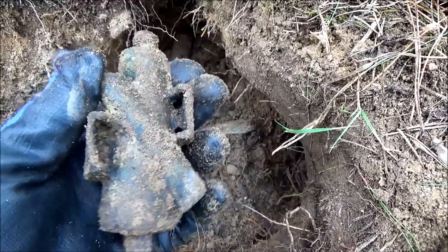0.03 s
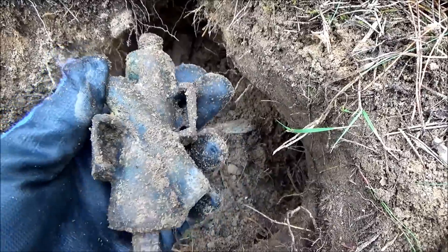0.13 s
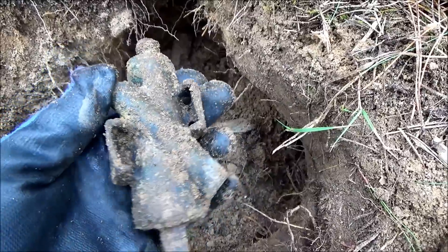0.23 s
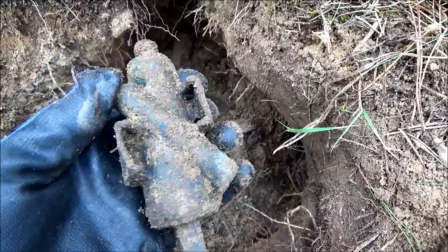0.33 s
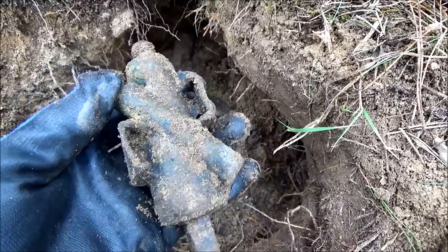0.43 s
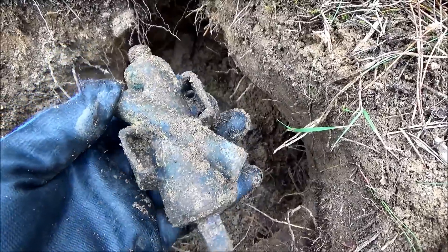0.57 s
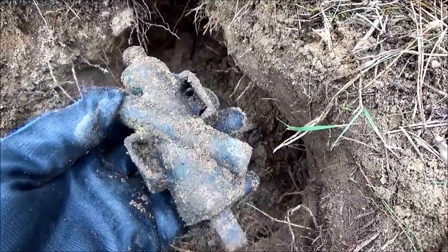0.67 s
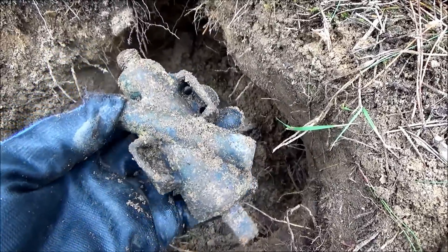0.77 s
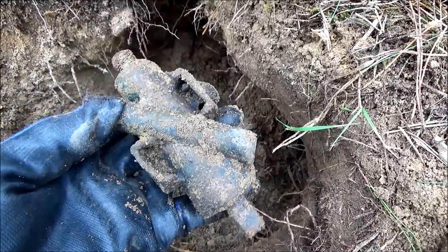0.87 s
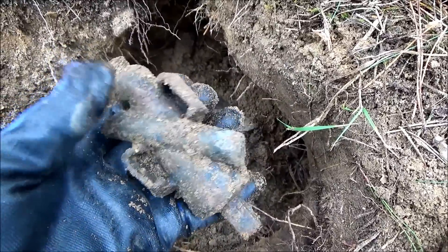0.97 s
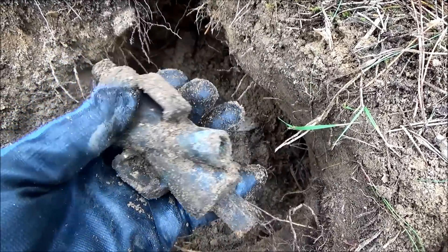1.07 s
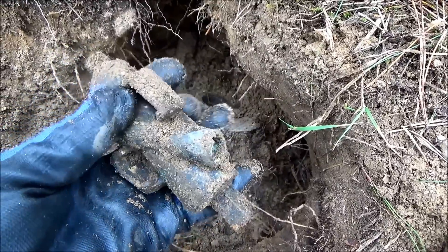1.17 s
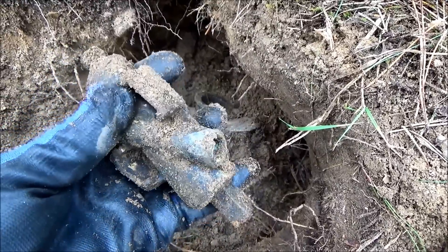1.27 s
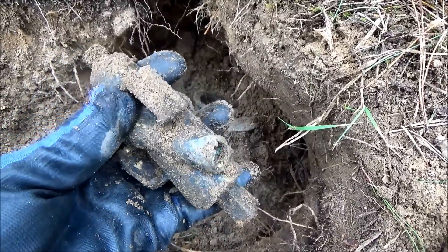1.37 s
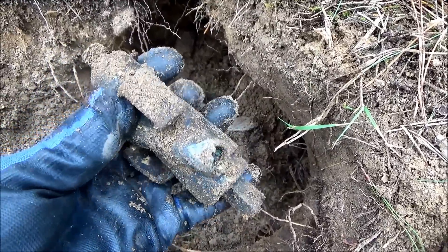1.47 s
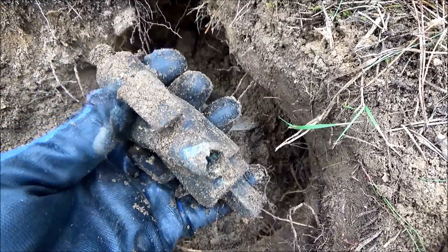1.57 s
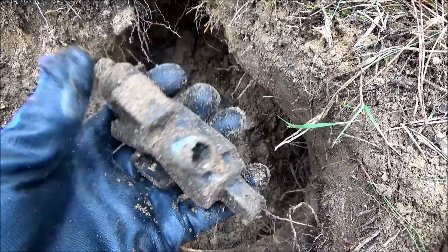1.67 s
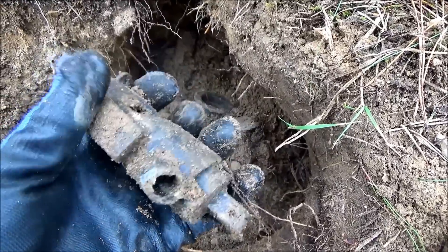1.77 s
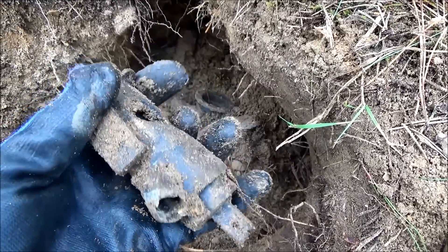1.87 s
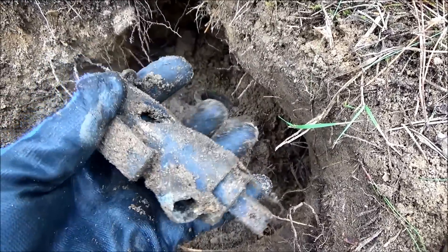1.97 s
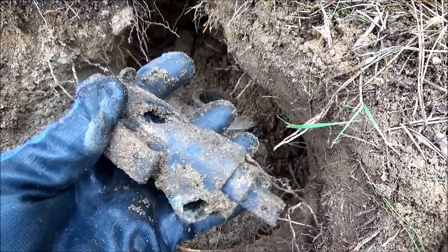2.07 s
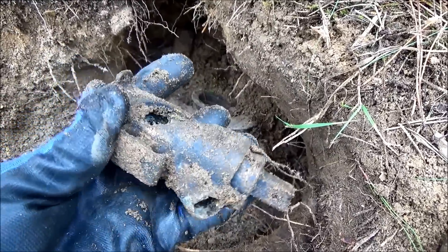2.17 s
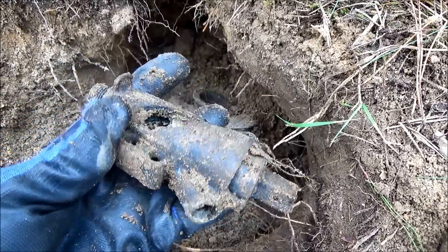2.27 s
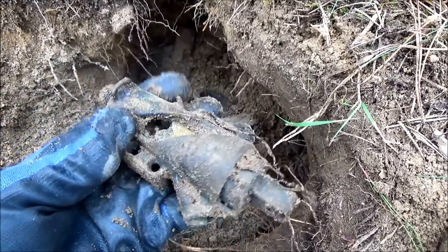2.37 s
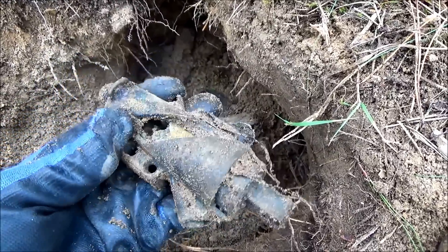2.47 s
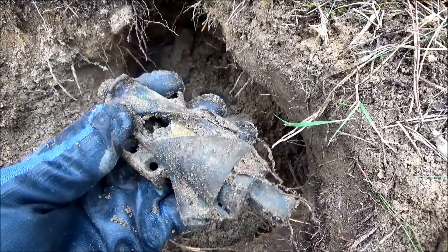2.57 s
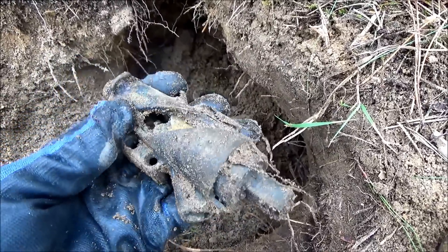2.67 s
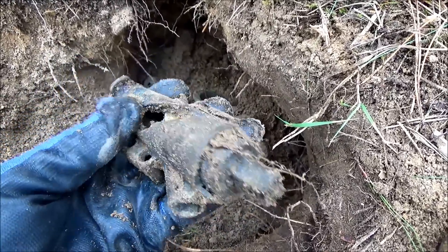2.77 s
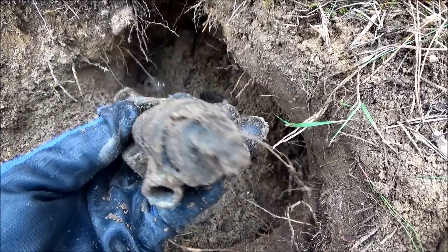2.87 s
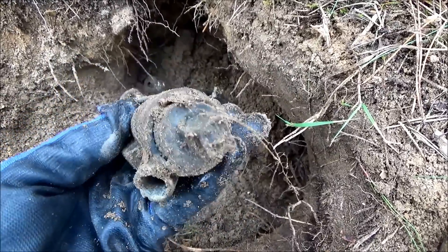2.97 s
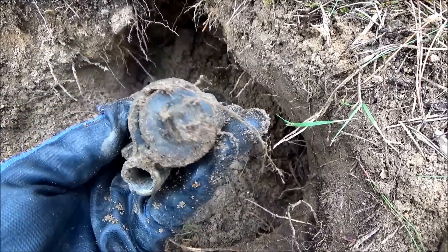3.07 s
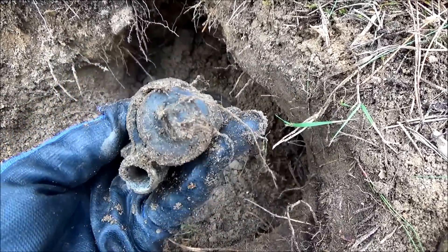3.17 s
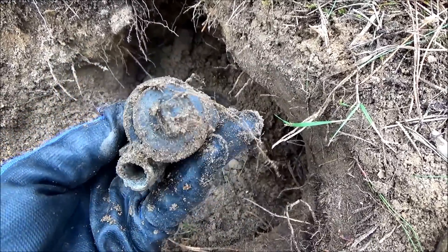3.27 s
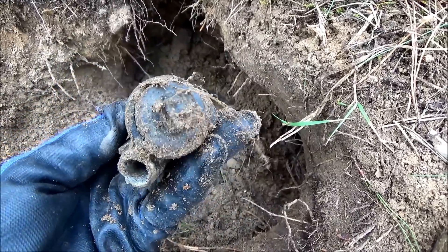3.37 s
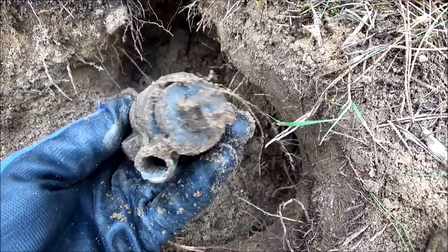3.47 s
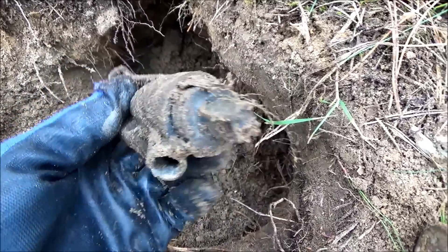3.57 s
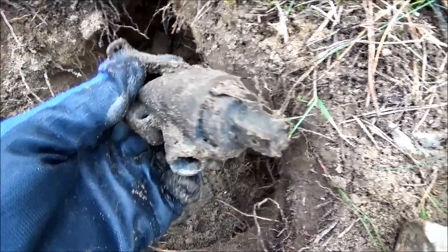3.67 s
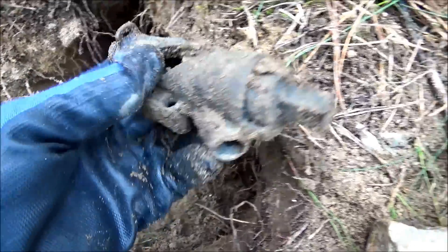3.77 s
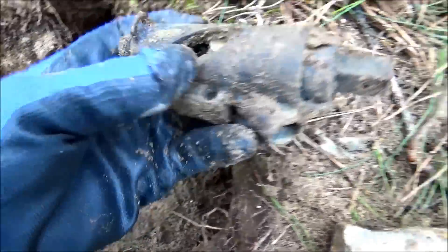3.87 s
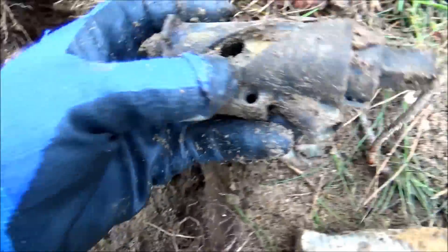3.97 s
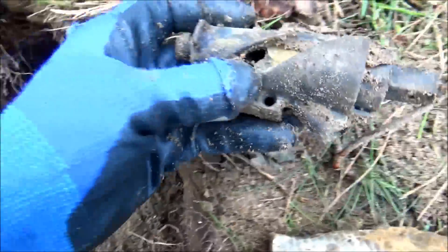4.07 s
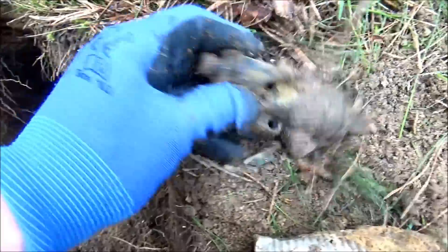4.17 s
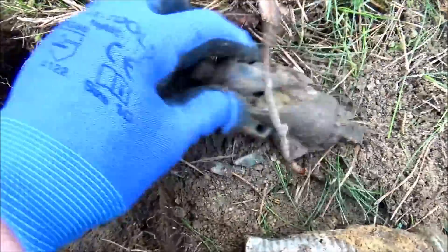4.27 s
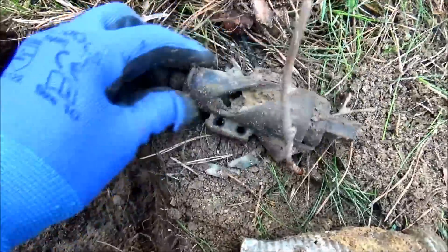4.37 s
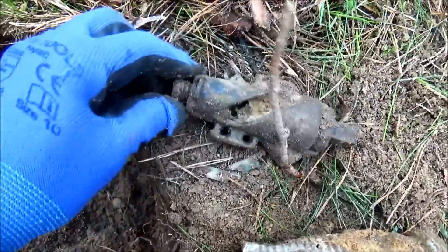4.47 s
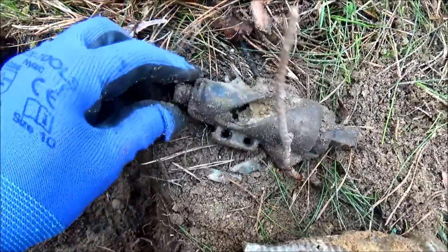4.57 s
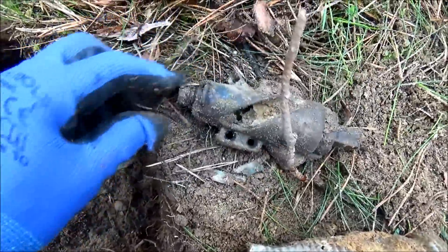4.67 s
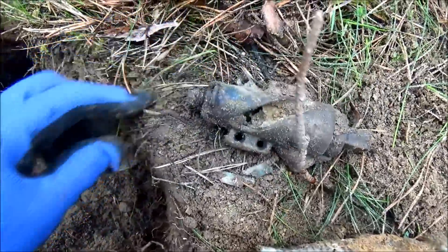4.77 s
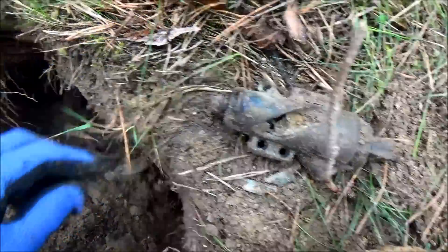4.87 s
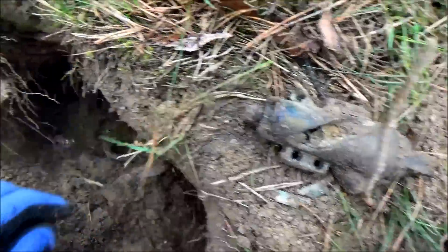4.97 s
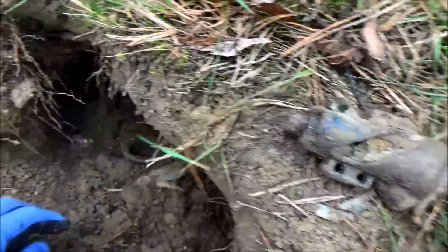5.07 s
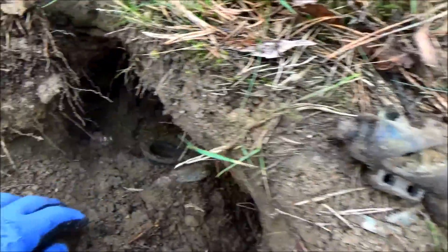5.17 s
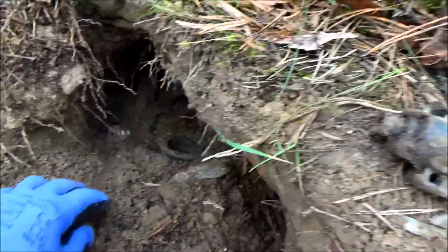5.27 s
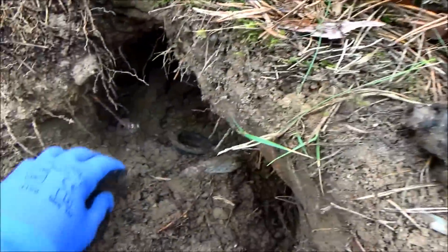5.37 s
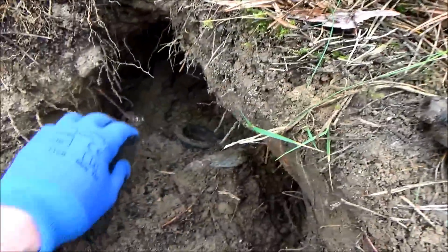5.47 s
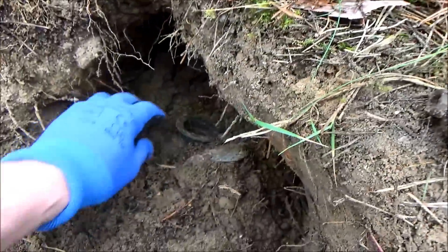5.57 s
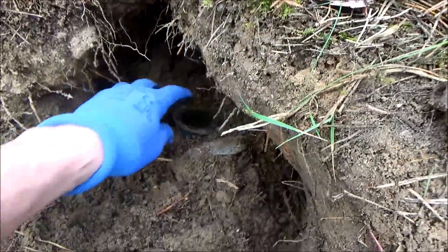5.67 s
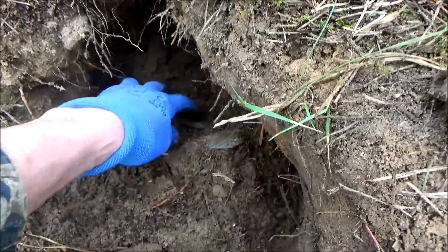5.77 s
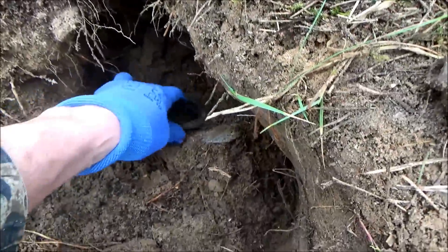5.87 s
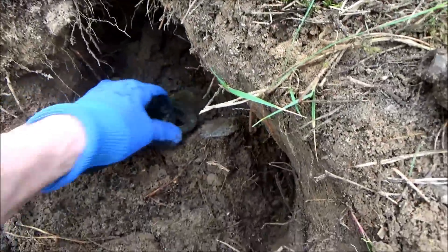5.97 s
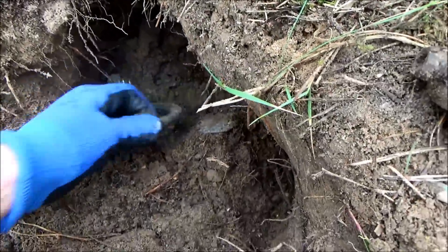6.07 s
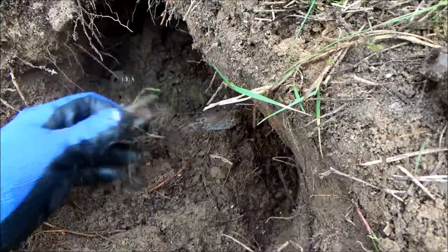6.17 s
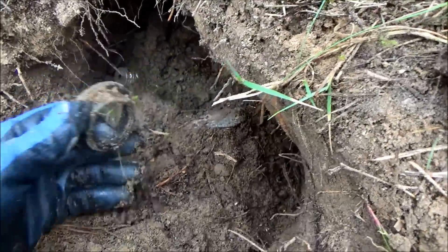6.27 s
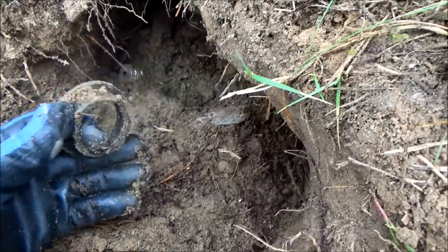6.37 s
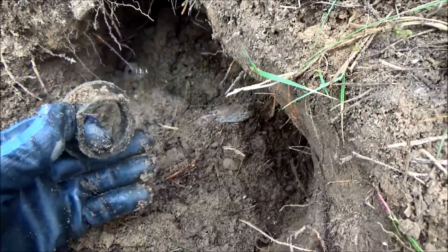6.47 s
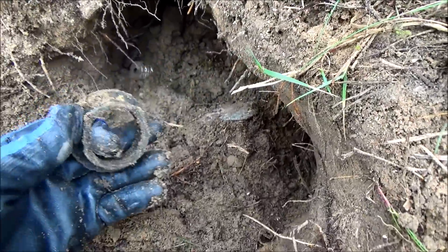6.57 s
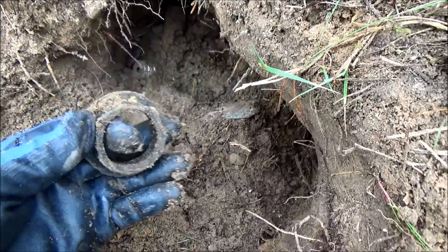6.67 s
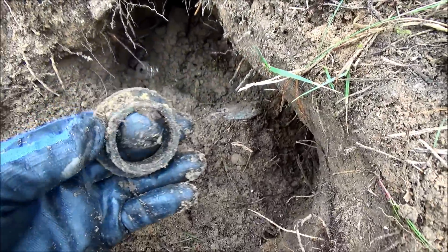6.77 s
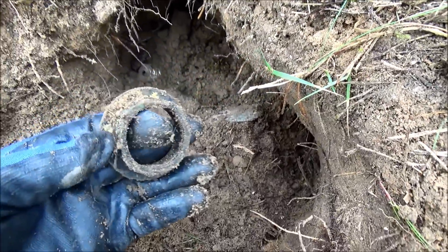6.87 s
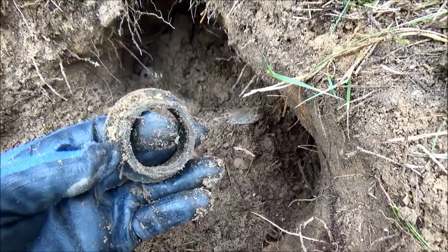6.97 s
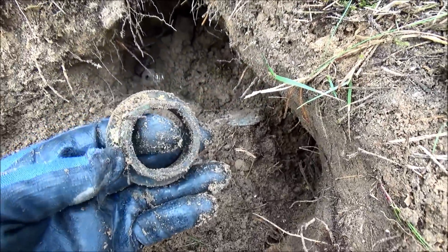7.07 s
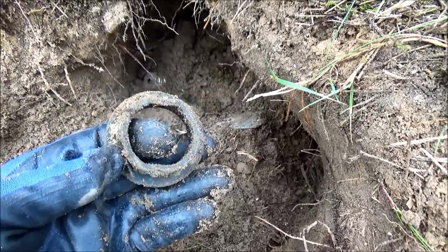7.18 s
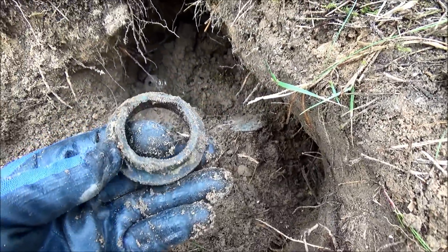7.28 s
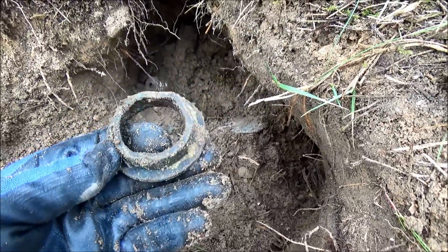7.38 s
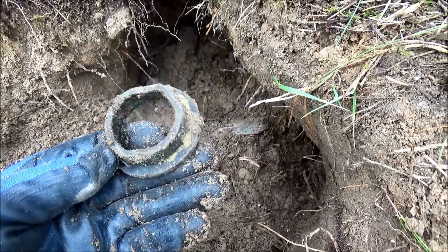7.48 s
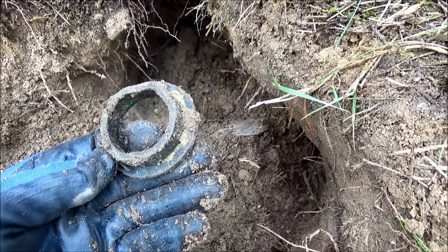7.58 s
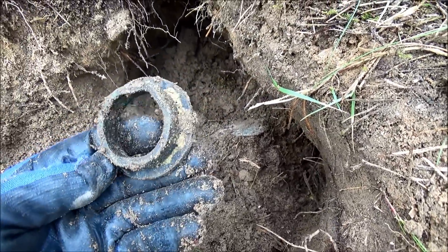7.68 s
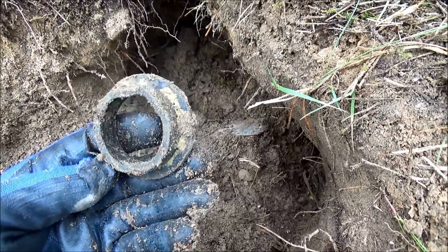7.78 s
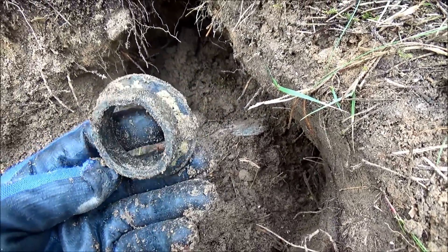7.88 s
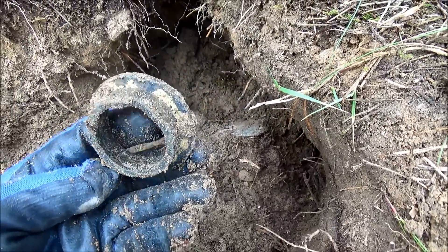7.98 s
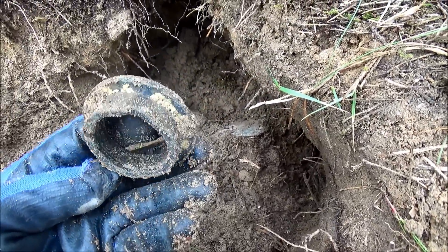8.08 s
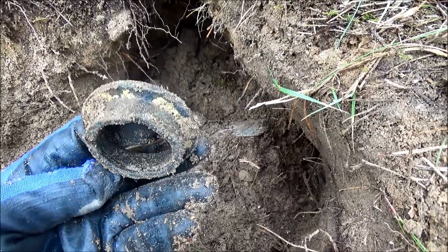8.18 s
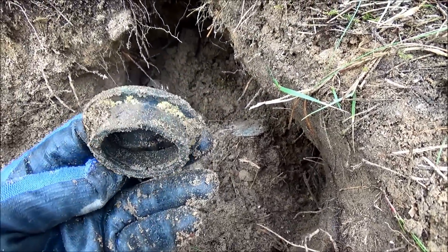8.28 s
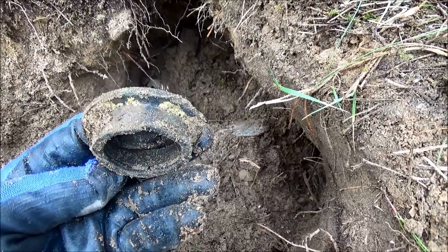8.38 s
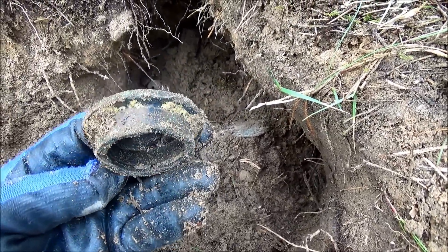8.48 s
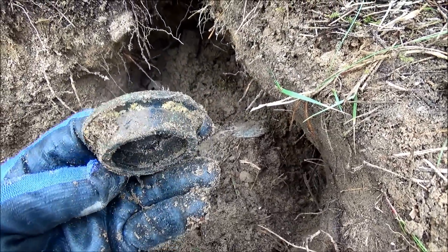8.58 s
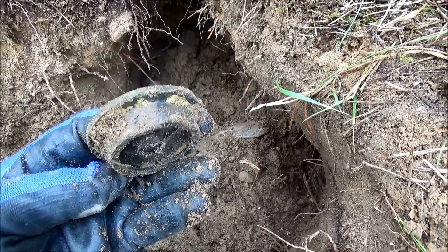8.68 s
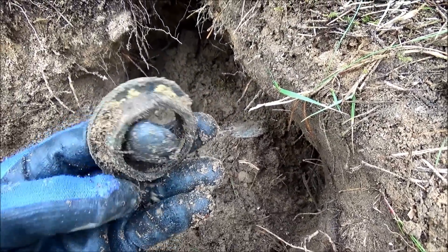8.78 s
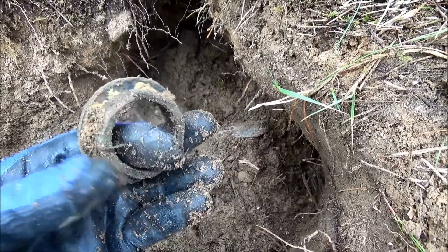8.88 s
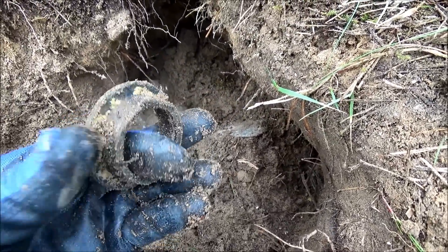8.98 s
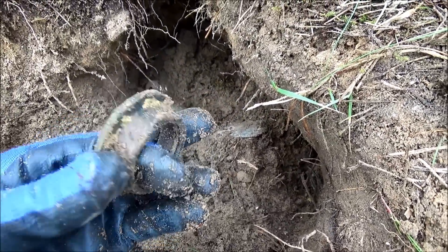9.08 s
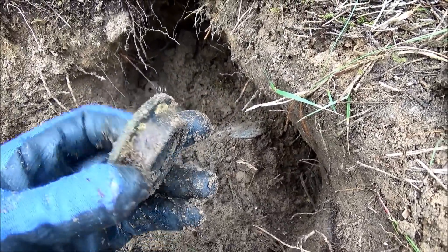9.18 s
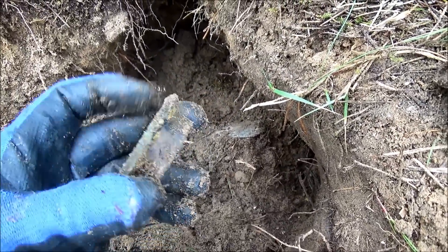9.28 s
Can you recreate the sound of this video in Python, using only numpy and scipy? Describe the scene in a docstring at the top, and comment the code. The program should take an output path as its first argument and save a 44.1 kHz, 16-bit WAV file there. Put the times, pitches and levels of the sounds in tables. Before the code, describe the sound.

An outdoor close-up in a quiet wood. Gritty glove strokes on a hollow, dirt-caked casting come busily for over four seconds, full of dry ticks. They nearly stop around five seconds, letting the birds and soft air through. After dull knocks in the earth near six, lighter rubbing resumes and ends with two brisk swipes. A thrush sings repeated gliding whistles with light tree echoes, with fainter birds far behind.

```python
"""Gloved hands on soil-crusted metal in a wood

Rubbing is dense fracture noise in four bands that follow each stroke; single grains snap as filtered bursts.
Slips sound the hollow casting, and damped sines thud softly and bump low. A thrush sings repeated phrases of
gliding pure tones, with tree echoes and fainter birds far off. Under them lies a hush of partly coherent noise
over a slowly swelling rumble."""
import sys
import numpy as np
from scipy import signal
from scipy.fft import rfft, irfft
from scipy.io import wavfile
from scipy.ndimage import uniform_filter1d

SR = 44100
rng = np.random.default_rng(int(sys.argv[2]) if len(sys.argv) > 2 else 0)


def output_pcm(signal):
    """Save a mono or channel-first signal as 16-bit PCM at the path in sys.argv[1].

    Samples are clipped to [-1, 1] before scaling.
    """
    pcm = np.clip(np.atleast_2d(signal).T, -1, 1) * 32767
    wavfile.write(sys.argv[1], SR, np.round(pcm).astype(np.int16))


N = 411453
TIME = np.arange(N) / SR


def amp(db):
    """Decibel law: 20 dB is a factor of ten in amplitude."""
    return 10 ** (np.asarray(db) / 20)


def evened(x):
    """Normalization to unit root-mean-square level."""
    return x / np.sqrt(np.mean(x ** 2) + 1e-20)


def steadied(x, size=1500):
    """Short-time normalization: the running power is made unity, the finer grain stays."""
    power = uniform_filter1d(uniform_filter1d(x ** 2, size), size)
    return x / np.sqrt(abs(power) + 1e-12)


def read(points, hz):
    """Interpolation of a spectrum on a logarithmic frequency axis."""
    f, value = np.transpose(points)
    return np.interp(np.log(hz + 1), np.log(f + 1), value)


def follow(rows):
    """Linear interpolation of a curve's columns at every sample."""
    times, *columns = np.transpose(rows)
    return [np.interp(TIME, times, column) for column in columns]


def add(mix, start_s, sound):
    """Superposition: a sound is summed into the mix from its start time."""
    part = mix[max(round(start_s * SR), 0):][:len(sound)]
    part += sound[:len(part)]


def colour(x, spectrum, size=2048):
    """Minimum-phase filtering: a causal response leaves clicks their sharp front."""
    hz = abs(np.fft.fftfreq(size, 1 / SR))
    log_gain = np.log(amp(read(spectrum, hz)) + 1e-5)
    # the Hilbert transform of the log gain gives the minimum phase
    taps = np.fft.ifft(np.exp(np.conj(signal.hilbert(log_gain)))).real
    return signal.oaconvolve(x, taps[:size // 2])[:len(x)]


def below(x, hz, order=4):
    """Zero-phase low-pass filtering, run forwards and backwards."""
    sections = signal.butter(order, min(hz, SR / 2 - 1), fs=SR, output="sos")
    return signal.sosfiltfilt(sections, x)


def wander(hz):
    """Low-passed noise: a slow random fluctuation with a spread of 1."""
    smoothing = 1 + (np.fft.rfftfreq(N, 1 / SR) / hz) ** 2
    return evened(irfft(rfft(rng.standard_normal(N)) / smoothing, N))


def swells(rows):
    """Power summation of bell-shaped strokes that speed up and slow down again."""
    edge_db = -21  # level of a bell one rise before its peak and one fall after, relative to the peak
    coarse_time, power = TIME[::32], 0
    for peak_s, rise_s, fall_s, db in rows:
        away = (coarse_time - peak_s) / np.where(coarse_time < peak_s, rise_s, fall_s)
        power = power + amp(db + edge_db * away ** 2) ** 2
    return np.interp(TIME, coarse_time, np.sqrt(power))


def crackle(per_s, spread_db, clump_db, clump_hz, ring_s, shift_hz=25, count=32):
    """Random fracture impulses in clumps: most small, few large; one contact spot rings alike."""
    size_db = spread_db * np.minimum(rng.exponential(1, N), 5) + clump_db * wander(clump_hz)
    happens = rng.random(N) < per_s / SR
    clicks = amp(size_db) * happens * rng.choice([-1, 1], N)
    # the contact spot drifts steadily and jumps about at random
    spot = np.round(2 * wander(shift_hz) + rng.standard_normal(N) + 10 * TIME) % count
    t = TIME[:200]
    rings = rng.standard_normal((count, len(t))) * np.exp(-t / ring_s)
    sound = np.zeros(N)
    for k, ring in enumerate(rings):
        sound += signal.oaconvolve(clicks * (spot == k), evened(ring))[:N]
    return sound


# Difference between the ports, before the source's own width is added: (frequency [Hz], level [dB])
PORT_WIDTH = [(110, -22), (380, -11), (700, -8), (1300, -12), (2400, -17), (4300, -22), (6000, -19),
              (8100, -12), (10000, -20), (15000, -28)]
# Left-over-right balance of the ports: (frequency [Hz], balance [dB])
PORT_BALANCE = [(400, 0), (1300, 1.3), (2700, .3), (5000, .5), (7500, 1.6), (10000, .6), (15000, 0)]


def ports(x, width_db, size=200):
    """Spatial decorrelation: two close microphone ports hear slightly different colours of one sound."""
    hz, spectrum = np.fft.rfftfreq(N, 1 / SR), rfft(x)
    scatter = np.exp(1j * np.angle(rfft(rng.standard_normal(size), N)))
    side = 1j * spectrum * scatter * amp(read(PORT_WIDTH, hz) + width_db)
    balance = amp(read(PORT_BALANCE, hz) / 2)
    return irfft(np.array([spectrum * balance + side, spectrum / balance - side]), N)


# Spectrum of air in the trees: (frequency [Hz], relative level [dB])
HUSH_SPECTRUM = [(12, -26), (20, 1.5), (107, 3), (459, -2), (780, -1), (1480, -7.5), (1660, -2.5),
                 (2530, -8.5), (2990, -5), (3840, -7), (5530, -12.5), (7730, -14.5), (9140, -11.5),
                 (14700, -22), (16000, -23)]
# Left-right coherence of that air: (frequency [Hz], coherence [0-1])
HUSH_COHERENCE = [(30, .99), (70, .975), (130, .92), (290, .65), (640, .3), (1400, .3), (3100, .8),
                  (6800, .5), (15000, .4)]
# Low rumble, before its quicker swell: (time [s], level [dB])
RUMBLE_LEVEL = [(0, -67), (2.3, -63), (3.3, -58.5), (4.3, -64), (5.6, -68), (6.9, -64.5), (7.8, -63.5),
                (8.7, -62.5), (9.33, -64)]


def hush():
    """Diffuse-field coherence: air in distant trees, over a rumble that swells and sinks."""
    air_db = -56  # level of the air below 1330 Hz, bass included
    swell_db, swell_hz = 2.5, 2.2  # random swell of the rumble
    hz = np.fft.rfftfreq(N, 1 / SR)
    left, other = rfft(rng.standard_normal((2, N)))
    same = np.clip(read(HUSH_COHERENCE, hz), 0, 1)
    right = same * left + np.sqrt(1 - same ** 2) * other
    air = irfft(np.array([left, right]) * amp(read(HUSH_SPECTRUM, hz)), N)
    air *= amp(air_db) / below(air, 1330).std()
    # the bass is lifted out and given the level of the rumble
    bass = below(air, 112)
    rumble_db, = follow(RUMBLE_LEVEL)
    return air - bass + evened(bass) * amp(rumble_db + swell_db * wander(swell_hz))


def whistles(rows):
    """Frequency modulation: pure notes, level or gently sliding, that swell and fade."""
    out = np.zeros(N)
    for start_s, length_s, start_hz, end_hz, db in rows:
        pitch = np.linspace(start_hz, end_hz, round(length_s * SR))
        tone = np.sin(2 * np.pi * np.cumsum(pitch) / SR)
        add(out, start_s, amp(db) * tone * signal.windows.tukey(len(pitch), .6))
    return out


def syllable(shape, stretch, size=90):
    """Phase integration of a gliding pitch; the sweep is stretched about its opening pitch."""
    offset_s, hz, db = np.transpose(shape)
    t = np.arange(offset_s[0], offset_s[-1], 1 / SR)
    pitch = uniform_filter1d(np.interp(t, offset_s, hz[0] + stretch * (hz - hz[0])), size)
    tone = np.sin(2 * np.pi * np.cumsum(pitch) / SR)
    return amp(np.interp(t, offset_s, db)) * tone * signal.windows.tukey(len(t), .08)


def phrases(pairs):
    """Superposition in time: each syllable shape is sung at the times of its phrase."""
    song = np.zeros(N)
    for shape, phrase in pairs:
        for anchor_s, db, stretch in phrase:
            add(song, anchor_s + shape[0][0], amp(db) * syllable(shape, stretch))
    return song


def trees(x, delay_s, t60):
    """Multiple scattering by trunks: sparse random echoes with exponential decay."""
    t = TIME[:SR]
    arrives = (rng.random(SR) < 1500 / SR) * (t > delay_s)
    taps = rng.standard_normal(SR) * arrives * amp(-60 * t / t60)
    return signal.fftconvolve(x, taps / np.linalg.norm(taps))[:N]


# Syllables of the thrush: (time from anchor [s], pitch before stretching [Hz], relative level [dB])
TUMBLE_SHAPE = [(-.013, 3450, -20), (-.0095, 3000, -4), (-.006, 2650, -8), (-.003, 2700, -35),
                (-.001, 3550, -13), (.003, 3000, -1), (.007, 2720, -4), (.009, 3150, -4), (.013, 2800, 0),
                (.02, 2450, -5), (.033, 1750, -20), (.046, 1500, -21), (.068, 1400, -25)]
WHIP_SHAPE = [(-.032, 3000, -28), (-.024, 5400, -17), (-.018, 6400, -22), (-.011, 5000, -17),
              (-.005, 3950, -1), (.001, 3650, 0), (.008, 3780, -1), (.014, 4400, -22)]
SCOOP_SHAPE = [(-.013, 3950, -18), (-.005, 3400, -3), (.002, 3270, 0), (.007, 3480, -2), (.013, 4200, -20)]
ARCH_SHAPE = [(-.075, 3050, -32), (-.05, 3100, -11), (-.032, 3250, -4), (-.018, 3570, -4),
              (-.007, 3920, -5), (.001, 4000, -5), (.01, 3830, -4), (.023, 3300, 0), (.037, 2970, -1),
              (.048, 2850, -4), (.058, 2820, -18)]
RISE_SHAPE = [(-.034, 1300, -24), (-.02, 1700, -15), (-.008, 2200, -8), (-.001, 2350, 0), (.009, 2330, -10)]
FLICK_SHAPE = [(-.007, 2600, -14), (-.003, 3400, -1), (0, 4200, 0), (.005, 5300, -9)]
# Its phrases, levels before flutter and mixing: (anchor time [s], level [dB], stretch of pitch sweep [ratio])
TUMBLE_PHRASE = [(1.904, -25, 1), (2.161, -22.5, 0.98), (2.388, -23.5, 1), (2.62, -25, 0.97)]
WHIP_PHRASE = [(2.803, -22.5, 0.99)]
SCOOP_PHRASE = [(2.837, -24.5, 1), (2.873, -27.5, .88)]
ARCH_PHRASE = [(5.52, -36, 1.15), (5.811, -29.5, 1.13), (6.067, -24, .88), (6.306, -21.5, .6)]
RISE_PHRASE = [(6.467, -29.5, 0.96), (6.541, -31, 0.83), (6.608, -29, 0.97), (6.68, -31, 0.84),
               (6.749, -29.5, 0.88), (6.81, -30.5, 0.7)]
FLICK_PHRASE = [(6.881, -34, 1), (6.91, -33, 1), (6.941, -34, 1), (6.973, -34, 1), (7.007, -37, 1)]
# Whistles close by and deep in the wood, levels before flutter and mixing:
# (start time [s], length [s], start pitch [Hz], end pitch [Hz], level [dB])
NEAR_WHISTLES = [(1.019, .076, 3520, 3620, -35.5), (1.722, .03, 2050, 2450, -38),
                 (1.795, .042, 3260, 3170, -23), (6.014, .026, 4970, 4960, -33),
                 (6.043, .02, 4980, 4950, -34)]
DEEP_WHISTLES = [(.75, 0.053, 2200, 2050, -47), (1.14, .038, 2090, 2140, -44),
                 (1.28, 0.12, 2330, 2490, -52), (3.2, .2, 1685, 1915, -57), (4.86, 0.11, 2560, 2470, -54.5),
                 (5.0, 0.047, 4380, 4300, -51.5), (5.03, 0.15, 3080, 2750, -50),
                 (6.07, .04, 2210, 2170, -48), (6.29, 0.031, 2280, 2160, -46),
                 (7.15, 0.14, 2150, 2750, -49.5), (7.38, .07, 2250, 2040, -55.5),
                 (8.0, 0.066, 3780, 3630, -52), (8.05, 0.046, 2850, 2680, -55),
                 (8.26, 0.11, 4420, 4150, -54), (8.29, 0.102, 1630, 1483, -56), (8.4, .17, 1610, 1880, -59),
                 (8.42, 0.037, 2740, 2800, -48.5), (8.61, 0.095, 2180, 1890, -53),
                 (8.78, 0.033, 4400, 4300, -48), (9.115, .02, 3030, 3200, -44),
                 (9.24, 0.11, 2660, 2720, -50.5)]


def birds():
    """Direct-to-reverberant ratio: loud phrases are mostly direct; soft and far notes hold more echo."""
    loud_song = [(TUMBLE_SHAPE, TUMBLE_PHRASE), (WHIP_SHAPE, WHIP_PHRASE),
                 (SCOOP_SHAPE, SCOOP_PHRASE), (ARCH_SHAPE, ARCH_PHRASE)]
    soft_song = [(RISE_SHAPE, RISE_PHRASE), (FLICK_SHAPE, FLICK_PHRASE)]
    # each group's level flutters at random
    loud = (whistles(NEAR_WHISTLES) + phrases(loud_song)) * amp(2.4 * wander(150))
    soft = phrases(soft_song) * amp(3.5 * wander(260))
    far = whistles(DEEP_WHISTLES) * amp(2.7 * wander(120))
    # low notes spread wider from the beak and so return more echo
    spread = loud + amp(5) * below(loud, 2400) + amp(1) * soft
    early_echo = amp(-9) * trees(spread, delay_s=.007, t60=.18)
    late_echo = amp(-15) * trees(spread, delay_s=.03, t60=.8)
    distant = amp(-3) * far + amp(-2.5) * trees(far, delay_s=.004, t60=.55)
    return loud + amp(-3) * soft + early_echo + late_echo + distant


# Low knocks and soft bumps, levels before the onset and decay shape them: # (start time [s], level [dB],
# frequency [Hz], decay time constant [s])
LOW_THUDS = [(3.329, -48, 69, 0.03), (3.6, -56, 45, .04), (4.315, -35.5, 124, 0.007),
             (5.925, -33, 140, 0.0045), (5.979, -36.5, 167, .024), (6.011, -37.5, 352, 0.011),
             (6.043, -33, 219, 0.0058), (6.077, -35.5, 210, 0.013), (6.494, -47, 70, 0.028),
             (8.67, -51, 75, .03), (8.81, -49, 55, .025)]


def thuds(rise_s=0.002):
    """Damped oscillation: low knocks of metal and hand on earth, and softer low bumps."""
    out, t = np.zeros(N), TIME[:9000]
    for start_s, db, hz, decay_s in LOW_THUDS:
        envelope = np.exp(-t / decay_s) * (1 - np.exp(-t / rise_s))
        add(out, start_s, amp(db) * np.sin(2 * np.pi * hz * t) * envelope)
    return out


# Colour of the hollow casting: (frequency [Hz], relative gain [dB])
CASTING_COLOUR = [(700, -32), (1150, -8), (1400, 0), (1650, 6.5), (2150, 0), (2650, 1.5), (3300, -5),
                  (4500, -22), (7000, -11.5)]
# A finger drags over the casting: (time of greatest speed [s], rise [s], fall [s], level [dB])
CASTING_DRAGS = [(.13, 0.23, 0.16, -33), (.33, 0.091, 0.22, -34.5), (.63, 0.11, 0.15, -38)]


def dragging():
    """Stick-slip excitation: dense slips of the glove sound the hollow of the casting."""
    slips = crackle(6000, spread_db=1.5, clump_db=3, clump_hz=90, ring_s=0.00026)
    return steadied(colour(slips, CASTING_COLOUR)) * swells(CASTING_DRAGS)


def stray_snaps(rasp):
    """Random-arrival process: snaps at chance moments whose energy follows the rubbing, up to a limit."""
    per_s, limit_db = 14, -11  # mean rate and greatest energy
    over_rasp_db, low_db, spread_db = 17.5, 3, 2.5  # mean energy over the rasp, mean low boost, spread of both
    at = np.flatnonzero(rng.random(N) < per_s / SR)
    size, low = rng.standard_normal((len(at), 2)).T
    db = np.minimum(20 * np.log10(rasp[at]) + over_rasp_db + spread_db * size, limit_db)
    return list(zip(TIME[at], db, low_db + spread_db * low))


# Colour of a snapping grain: (frequency [Hz], relative gain [dB])
SNAP_COLOUR = [(300, -60), (1200, -26.5), (2500, -11), (5000, -0.5), (7500, 11), (9800, 16.5), (12500, 9),
               (16000, -4)]
# Grains that snap at set moments, beside the stray ones: (onset time [s], energy [dB], boost of the click below
# 5.2 kHz [dB])
SET_SNAPS = [(0.1998, -14, 7), (0.5614, 0, -10), (0.617, -2, 14), (0.7842, -6.5, 21), (0.7997, -5.0, 5),
             (0.813, -3, 4.0), (0.8291, -11, 4.0), (0.834, -5, 11), (1.0381, -9.5, -9),
             (1.1503, -4, 11.0), (1.2798, -14, 9.0), (1.3007, -7, 12), (1.4966, -4.5, 2),
             (1.904, -1.5, -5.0), (1.977, 5, 1), (1.996, 0, -4.0), (2.1332, -2, -5.0), (2.4724, -7, 5),
             (2.5052, -14, 7), (2.5356, -0.5, -13), (2.6233, -11, 1), (2.8005, -15, 4.0),
             (3.0656, -16, -2), (3.3097, -16, 7), (3.3298, -7, 17.5), (3.6754, 4, 0), (3.7074, 0, 20),
             (3.9384, 2, -2), (4.0594, 1, 1.0), (4.0651, -7.0, 6), (4.1333, -1, 7), (4.3865, -11, 1.0),
             (4.4337, 0, -4), (4.5174, -4, -5.0), (5.1417, -24, 21), (5.3755, -15.5, 25),
             (5.8115, -16.0, 1), (5.9375, -11.5, 6), (6.169, -5.5, 22), (6.2141, 0.0, 17),
             (6.9823, -9, 13), (7.0477, -17, 3.0), (7.2399, -7, -10), (7.9118, -4.5, 2),
             (7.9652, -7.5, 0.0), (8.1249, -15.5, 2.0), (8.1527, -10, -5.0), (8.1907, -12.5, -7),
             (8.3145, -14.5, -5), (8.3855, -11.5, 7), (8.4479, -16.5, 5.5), (8.4847, -16.5, -3.0),
             (8.6035, -18.5, -5.0), (8.7974, -14, 7), (8.9811, -6, 9), (9.1445, -8.5, 19),
             (9.2021, -2.0, -5.0)]


def snaps(rows, crumble_s=0.002, crumble_db=-17, front_s=.001):
    """Brittle fracture: a grain cracks, breaks with a sharp tick and sheds a few ms of crumbs."""
    out, t = np.zeros(N), TIME[:900] - front_s
    fracture = np.exp(-abs(t) / .00035) * (t >= 0)
    burst = fracture + amp(crumble_db) * np.exp(-abs(t) / crumble_s)
    for onset_s, db, low_db in rows:
        tick = colour(rng.choice([-1, 1], len(t)) * burst, SNAP_COLOUR)
        low = below(tick, 5200)
        tick = tick - low + amp(low_db) * low
        add(out, onset_s, amp(db) * tick / np.linalg.norm(tick))
    return out


# Strokes of the glove over crusted metal, soil and grass:
# (time of greatest speed [s], rise [s], fall [s], sandy rasp [dB],
#  then relative to the rasp: dull clods [dB], coarse grit [dB], fine dust [dB])
GLOVE_STROKES = [(0.045, 0.16, 0.023, -32.5, -22, -6, -13), (0.145, 0.12, 0.13, -25, -21.5, -4.0, -31),
                 (0.307, 0.11, 0.11, -30.5, -22, -0.5, -24), (0.43, 0.13, 0.04, -44, -2, -1, -8),
                 (0.582, 0.064, 0.19, -31.5, -22.5, -8.5, -21), (0.69, 0.08, 0.074, -40.5, -6, -14, -11.0),
                 (0.737, 0.5, 0.63, -35, -23.0, -9, -16), (1.022, 0.026, 0.029, -42.0, -3, 2, -8),
                 (1.189, 0.075, 0.16, -33.5, -16.5, -4.0, -9.0),
                 (1.626, 0.39, 0.25, -34.5, -20.0, -5.0, -13), (1.7, 0.036, 0.087, -28.5, -13.5, -2.5, -13),
                 (1.849, 0.084, 0.68, -31.0, -21, -11.5, -17),
                 (2.059, 0.069, 0.36, -32.0, -22.5, -9.5, -0.5), (2.327, 0.032, 0.67, -33, -17, -7.5, -11),
                 (2.476, 0.1, 0.015, -22.5, -21.5, -11.5, -10.0),
                 (2.627, 0.018, 0.096, -39.5, -19, -15, -7), (2.69, 0.01, 0.025, -32.5, -20, -18.5, -10),
                 (2.908, 0.13, 0.036, -34, -13.0, -4.5, -24),
                 (2.969, 0.054, 0.12, -30.5, -19.5, -11.5, -7.0),
                 (3.146, 0.048, 0.1, -40.5, -15, -9.5, -8.0), (3.33, 0.11, 0.06, -42, -10, -4.5, -9.0),
                 (3.443, 0.13, 0.13, -45.5, -5, -3, -11.0), (3.592, 0.099, 0.022, -29, -20.5, -12, -22),
                 (3.708, 0.14, 0.021, -23.5, -29, -8.5, -13), (3.748, 0.17, 0.056, -31, -13.5, -5.5, -10),
                 (3.952, 0.2, 0.091, -31, -14.5, -6.5, -16), (4.016, 0.045, 0.076, -31.5, -11.5, -8.5, -9),
                 (4.144, 0.062, 0.32, -37.5, -10.5, -9.5, -8.0),
                 (4.323, 0.15, 0.09, -28.0, -17, -8.5, -8.0), (4.43, 0.05, 0.03, -26, -25.0, -10.5, -6.0),
                 (4.482, 0.035, 0.1, -25.5, -24.5, -10.0, -14),
                 (4.77, 0.14, 0.084, -47.5, -18.0, -10, -9.0), (4.96, 0.3, 0.08, -49.5, -7.5, -5.0, -12),
                 (5.339, 0.044, 0.032, -53.5, -26, -4, -8.0), (5.824, 0.13, 0.2, -55.5, 2, -9, -6),
                 (5.927, 0.022, 0.05, -43, -14, -4, -4), (6.076, 0.14, 0.033, -36.5, -13.0, -5, -6),
                 (6.149, 0.08, 0.075, -39.5, -7, -2.5, -8.0), (6.356, 0.15, 0.14, -44.5, -26.0, -13, -13),
                 (6.674, 0.13, 0.025, -37.0, -22, -5, -16), (6.773, 0.08, 0.23, -40.5, -20.0, -8.5, -15),
                 (6.927, 0.07, 0.05, -36.5, -20, -4.5, -16), (7.074, 0.23, 0.017, -40, -20, -2.5, -14),
                 (7.18, 0.025, 0.036, -40, -18, -11, -15), (7.272, 0.19, 0.12, -40.5, -22, -9, -20),
                 (7.41, 0.14, 0.12, -42, -26, -10, -11), (7.525, 0.091, 0.16, -31, -32, -14.5, -13),
                 (7.784, 0.49, 0.3, -39.5, -38, -11.5, -13), (8.195, 0.082, 0.056, -45.5, -26, -15, -18),
                 (8.291, 0.012, 0.077, -44.5, -29, -17, -13), (8.555, 0.36, 0.46, -48.5, -23.0, -7, -6.0),
                 (8.753, 0.11, 0.47, -47.0, -18, -5.5, -14.0), (8.858, 0.023, 0.028, -44.5, -2, 4.5, -12.0),
                 (8.917, 0.079, 0.091, -28.5, -31, -16, -16), (9.085, 0.21, 0.034, -40.5, -17.5, -17, -12),
                 (9.166, 0.013, 0.11, -30, -32, -25, -16), (9.228, 0.28, 0.15, -44, -16, -3, -13)]


def stroke_levels():
    """Common modulation: rasp, clods, coarse grit and dust share each stroke's bell."""
    rest = amp(-75.5)  # added to every level, so the hand is never quite silent
    rows = np.array(GLOVE_STROKES)
    timing, rasp_db = rows[:, :3], rows[:, 3]
    rasp = swells(np.c_[timing, rasp_db]) + rest
    others = [swells(np.c_[timing, rasp_db + db]) + rest for db in rows[:, 4:].T]
    return [rasp] + others


# Colour of crackling grit: (frequency [Hz], relative gain [dB])
GRIT_COLOUR = [(180, -50.5), (300, -20), (385, -21), (519, -19), (915, -16.5), (1340, -14.5), (2140, -11),
               (3520, -12), (4750, -8), (6520, -3.5), (9240, 10), (10400, 10), (12700, 5), (15000, 1.5),
               (16000, 1)]


def rubbing(rasp, clods, coarse, dust):
    """Granular friction: soil grinds under the glove, and a brisker stroke breaks more grains a second."""
    grains_per_s, at_db, steepness = 7200, -39, .75  # rate at a rasp of at_db, and exponent of its growth
    stick_db, stick_hz = 1.89, 15  # the glove catches and slips within a stroke
    per_s = grains_per_s * (rasp / amp(at_db)) ** steepness
    fractures = crackle(per_s, spread_db=3.5, clump_db=1.5, clump_hz=100, ring_s=0.00034)
    grit = colour(fractures, GRIT_COLOUR)
    # clods sound lowest, then coarse grit, sand and dust
    low, mid, high = below(grit, 2490), below(grit, 5930, order=3), below(grit, 12740, order=8)
    sound = steadied(low) * clods
    sound += steadied(mid - low) * coarse
    sound += steadied(high - mid) * rasp
    sound += steadied(grit - high) * dust
    return sound * evened(amp(stick_db * wander(stick_hz)))


# Where the hands are: (time [s], extra left-over-right balance [dB])
HAND_BALANCE = [(0, 2.5), (.2, 3), (.45, 0), (6.2, -.2), (6.7, .1)]


def scene():
    """Superposition: hands near the microphone, birds almost central, and the hush all round."""
    balance_db, = follow(HAND_BALANCE)
    rasp, clods, coarse, dust = stroke_levels()
    grains = snaps(list(SET_SNAPS) + stray_snaps(rasp))
    soil = rubbing(rasp, clods, coarse, dust) + grains
    hands = ports(soil + dragging() + thuds(), width_db=-5.0)
    hands = hands * amp([balance_db / 2, -balance_db / 2])
    return hands + ports(birds(), width_db=-66) + hush()


def record(dry):
    """Band limiting: a linear-phase low-pass removes the highest treble."""
    edge_hz = 16050
    taps = signal.firwin(511, edge_hz, window=("kaiser", 9), fs=SR)
    return signal.oaconvolve(dry, taps[None], "same")


dry = scene()
out = record(dry)
output_pcm(out)
```